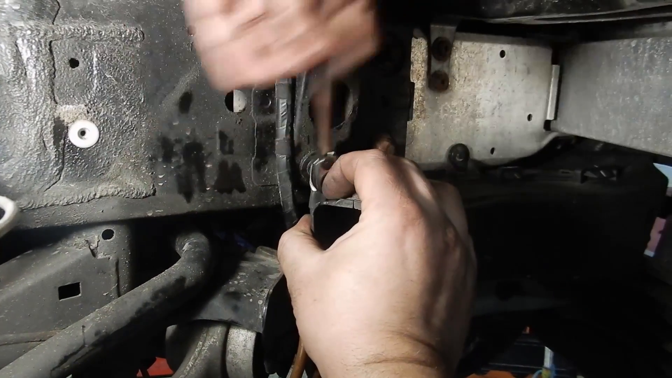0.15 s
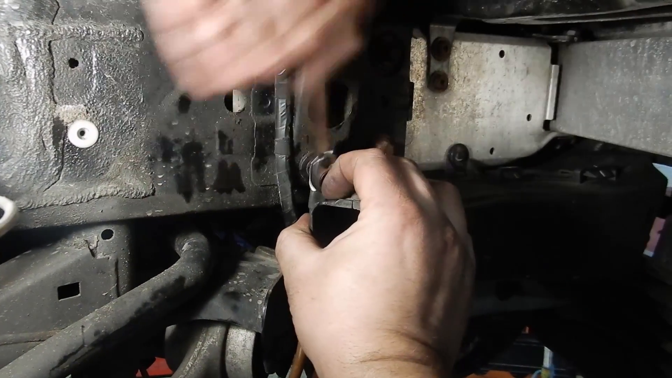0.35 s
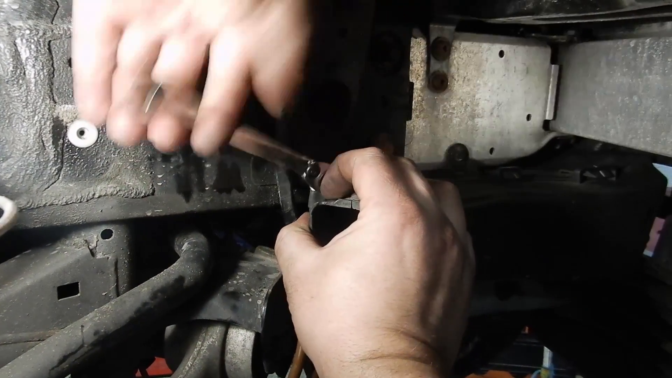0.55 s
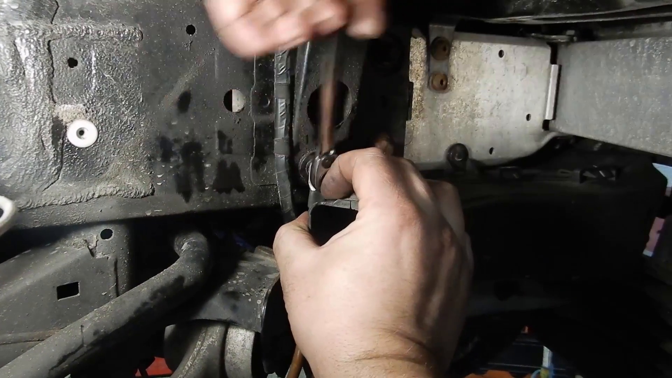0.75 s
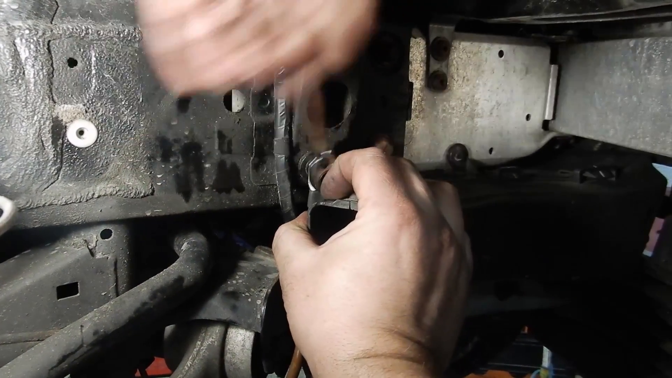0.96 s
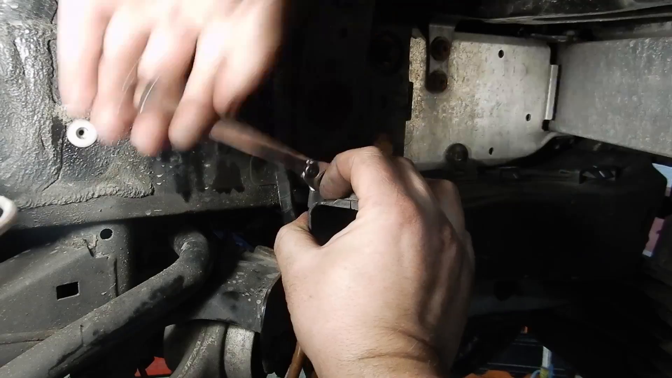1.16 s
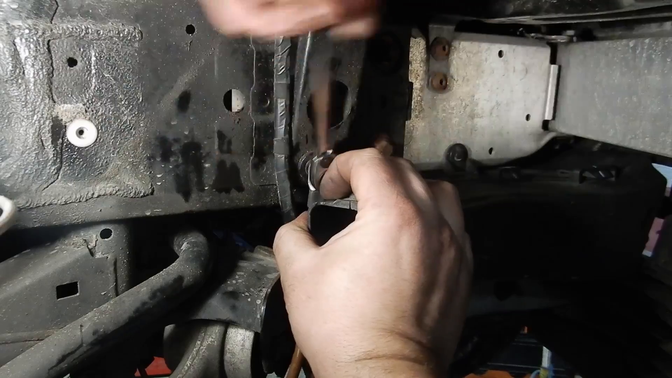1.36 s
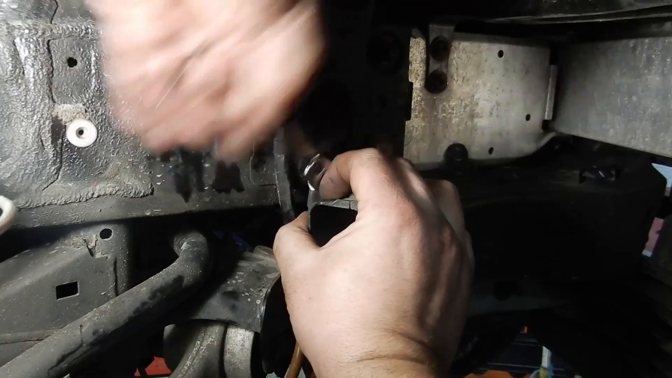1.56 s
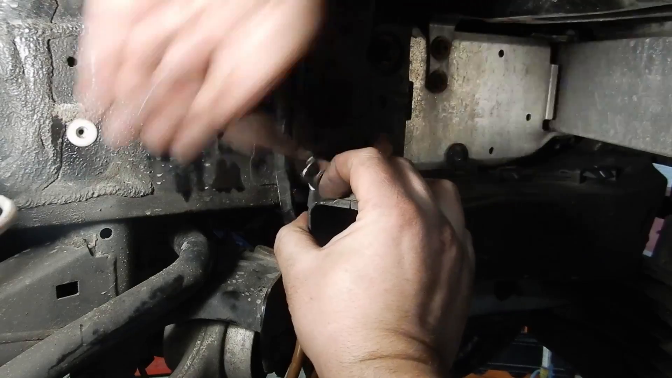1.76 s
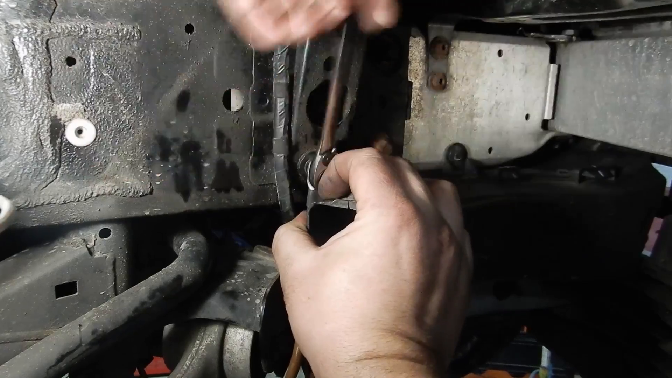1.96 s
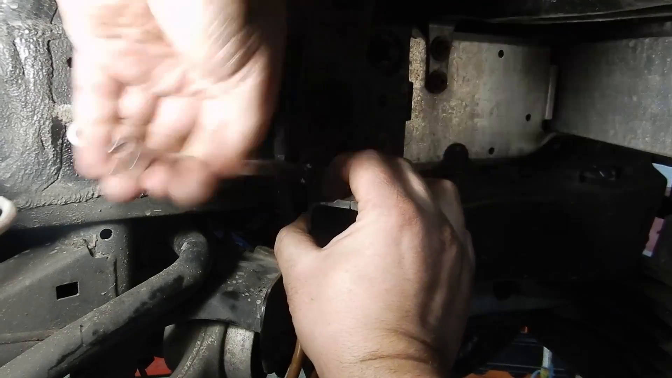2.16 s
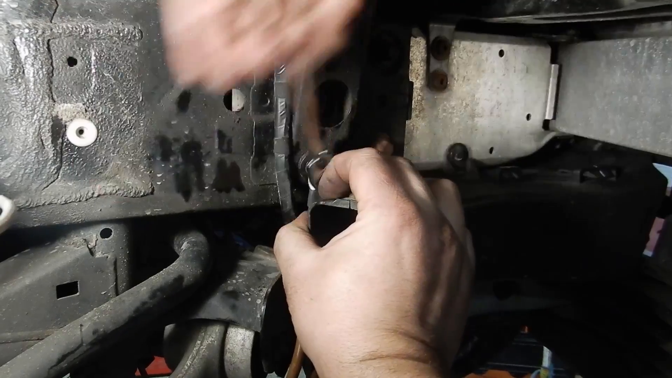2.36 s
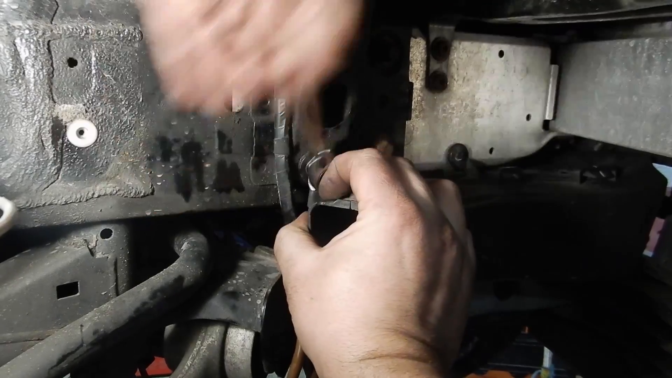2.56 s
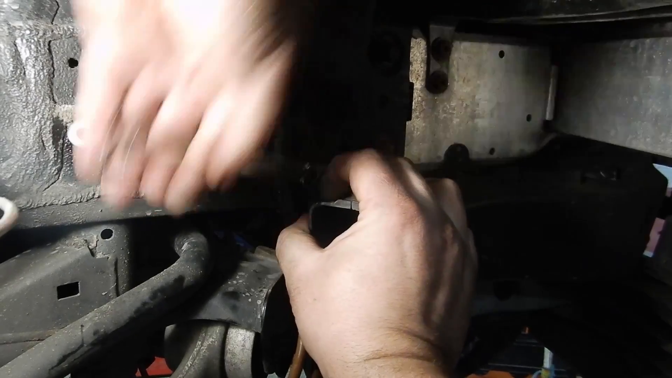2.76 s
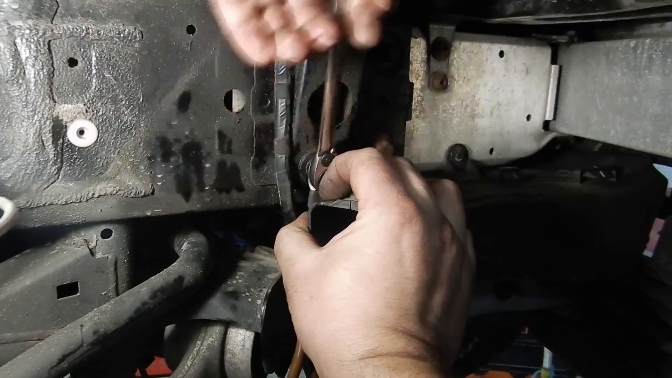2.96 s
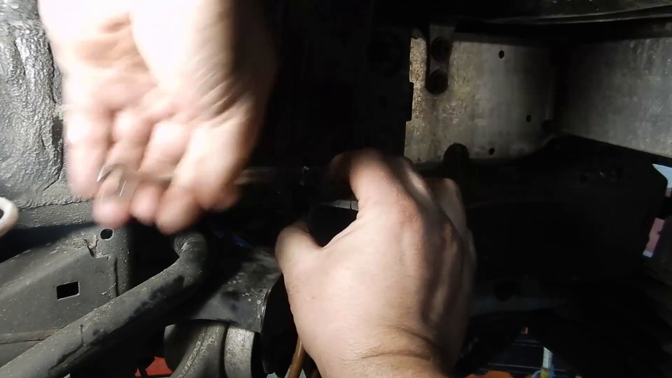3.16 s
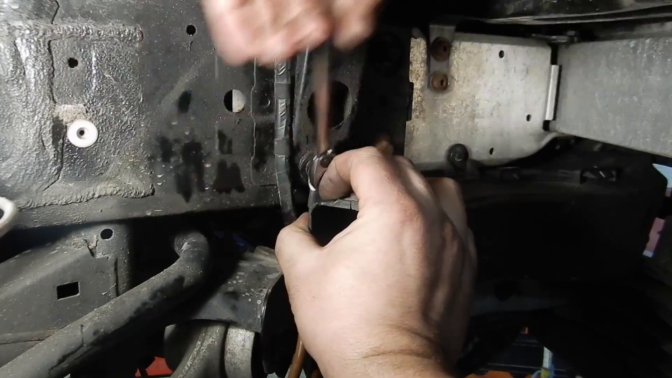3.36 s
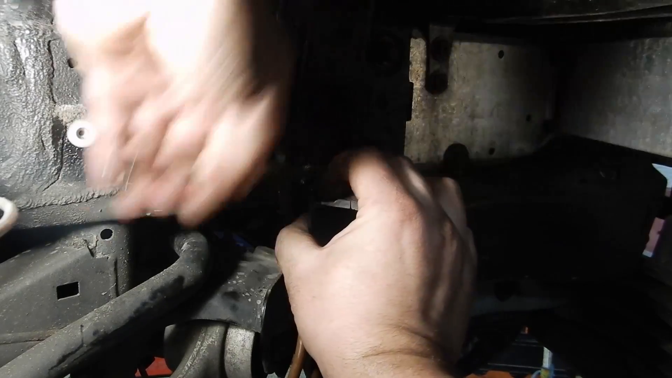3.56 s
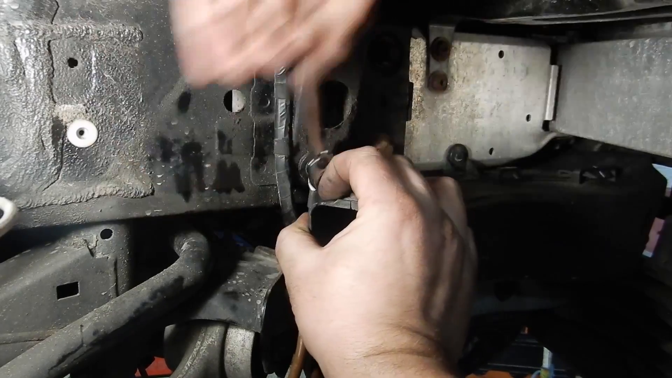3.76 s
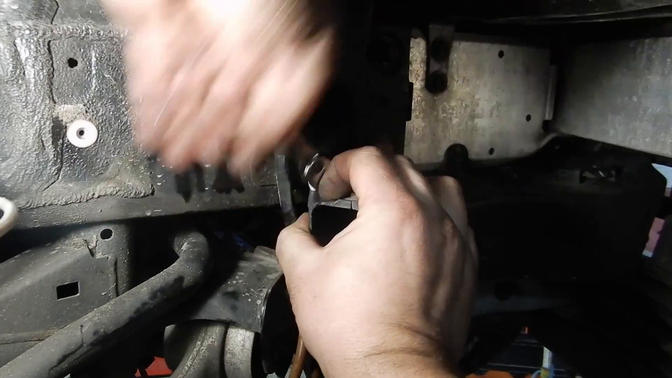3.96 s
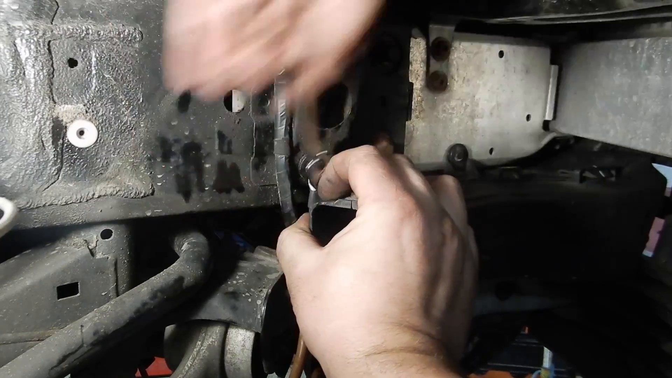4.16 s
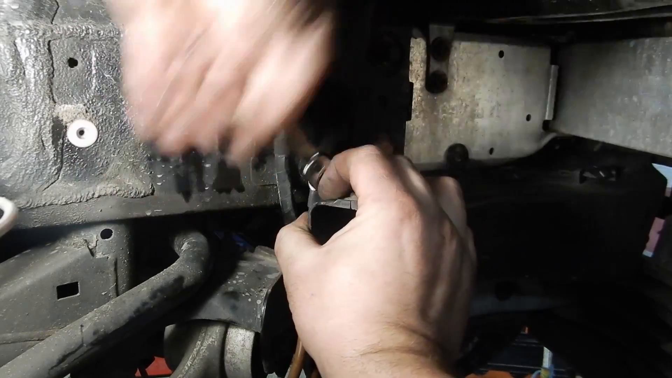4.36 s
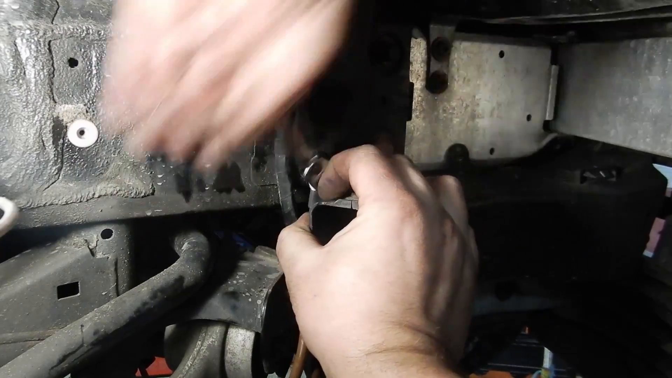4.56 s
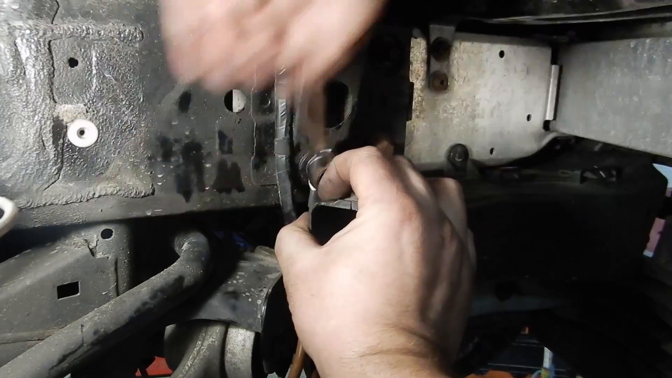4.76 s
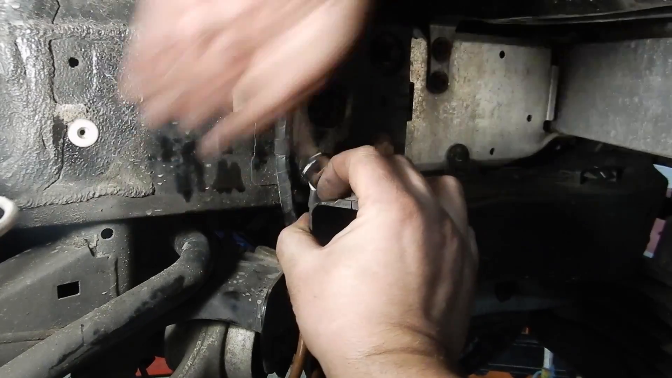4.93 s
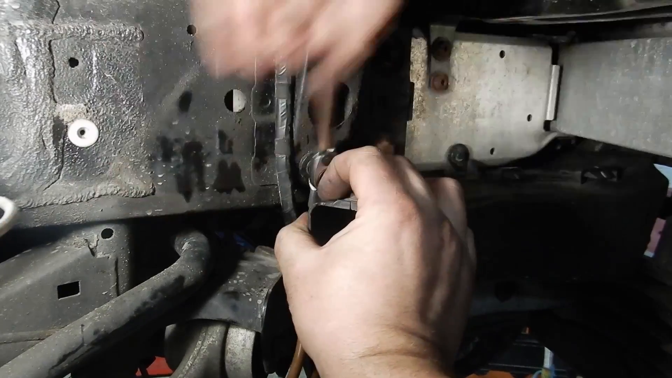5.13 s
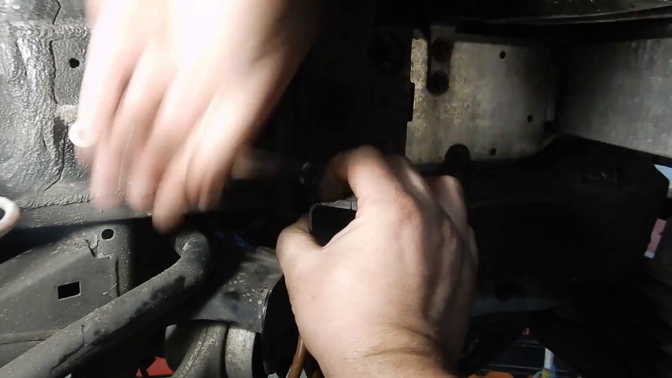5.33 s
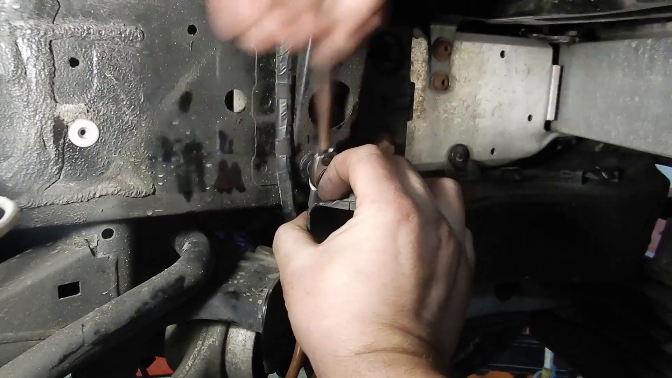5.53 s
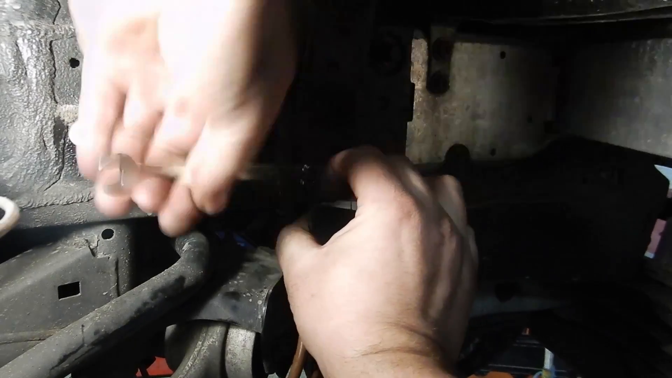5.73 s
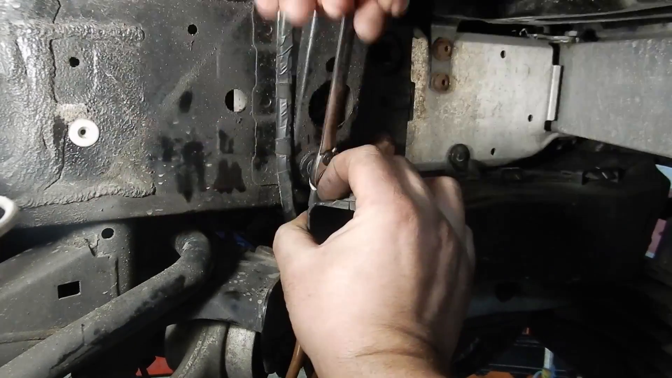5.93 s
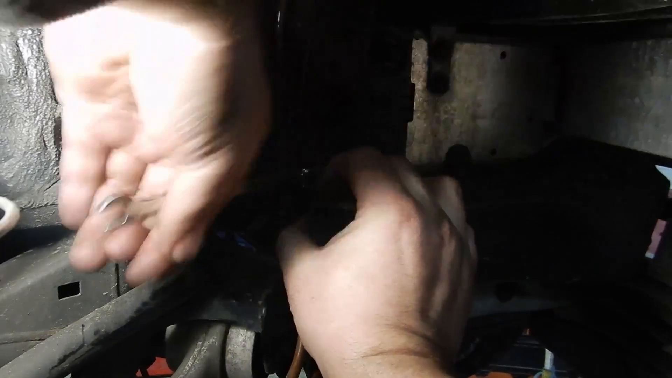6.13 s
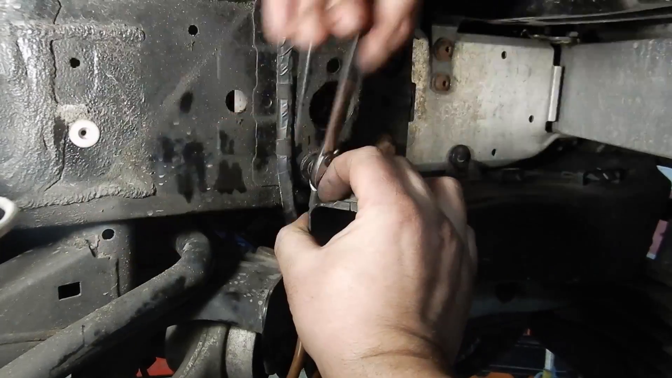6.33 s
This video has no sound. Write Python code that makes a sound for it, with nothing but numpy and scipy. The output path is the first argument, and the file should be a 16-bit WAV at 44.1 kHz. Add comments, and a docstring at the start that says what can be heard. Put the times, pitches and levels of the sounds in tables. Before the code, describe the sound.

Close stereo microphone under a car in a quiet garage. A ratcheting ring spanner swings back and forth: about every third of a second a rapid zip of eight to fifteen bright steel clicks, slowing at its end. Between zips the nut ticks faintly, its thread rubs and the hand rustles. Occasional dull bumps on sheet metal; low air and mains hum beneath.

```python
"""Under a car in a garage, close to the stereo microphone: air and a faint mains hum, then a ratcheting ring spanner.
On each back swing the pawl snaps over 8 to 15 teeth, slowing at the end, and rings the steel; each onset is softened.
On each drive swing between, the nut ticks and its thread rubs while the hands rustle, more with more effort.
Now and then the underbody is bumped; from about four seconds steel faintly sings on steel in a few slides.
Blows excite decaying resonances, rubs are coloured noise, walls add an echo and a limiter holds the loudest clicks."""
import sys
import numpy as np
from scipy import signal
from scipy.fft import irfft, next_fast_len
from scipy.io import wavfile
from scipy.ndimage import uniform_filter1d, minimum_filter1d

SR = 44100
rng = np.random.default_rng(int(sys.argv[2]) if len(sys.argv) > 2 else 0)


def persist_wave(psi):
    """Save psi, clipped to +-1, as 16-bit WAV."""
    counts = np.round(np.clip(psi, -1, 1) * 32767).astype(np.int16)
    wavfile.write(sys.argv[1], SR, np.atleast_2d(counts).T)


N = 281799
TIME = np.arange(N) / SR


def undb(db):
    """Decibels to gain."""
    return 10 ** (np.asarray(db) / 20)


def curve(rows, at):
    """Rows (s, value) joined by straight lines."""
    return np.interp(at, *np.transpose(rows))


def on_log(points, hz):
    """Points (Hz, value) joined on a log-frequency axis."""
    point_hz, value = np.transpose(points)
    return np.interp(np.log(hz + 1), np.log(point_hz), value)


def flicker(rate, depth_db):
    """A gain that wanders at random, with `rate` new values a second."""
    steps = rng.standard_normal(2048)
    return np.interp(TIME * rate, np.arange(len(steps)), undb(depth_db * steps))


def arches(rows):
    """Strokes (s, length s, level dB) that each swell and fade."""
    strokes = 0
    for s, length, db in rows:
        across = 2 * (TIME - s) / length - 1  # -1 to 1 over the stroke
        strokes = strokes + undb(db) * np.sqrt(np.clip(1 - across ** 2, 0, 1))
    return strokes


# How alike the left and right microphones hear the place.
# Each row: frequency in Hz, likeness from 0 to 1.
LIKENESS = [(100, .72), (600, .95), (1200, .965), (2500, .98), (4500, .85), (8000, .62), (13000, .37)]


def stereo_noise(spectrum, size=N):
    """Noise of a given colour and unit power at two microphones, less alike towards the treble."""
    padded = 512 * next_fast_len(size // 512 + 1, real=True)
    hz = np.arange(padded // 2 + 1) * SR / padded
    gain = undb(on_log(spectrum, hz))
    gain = gain * np.sqrt(padded / np.mean(gain ** 2)) / 2
    alike = np.clip(on_log(LIKENESS, hz), 0, 1)
    random_bins = rng.standard_normal((2, 2 * len(hz))).view(complex)
    mid, side = random_bins * gain * np.sqrt([1 + alike, 1 - alike])
    return irfft(np.array([mid + side, mid - side], np.complex64), padded)[:, :size]


def convolve(x, response):
    """Pass a sound through a response."""
    return signal.oaconvolve(np.atleast_2d(x), np.atleast_2d(response), axes=-1)[:, :N]


def blows(s, size):
    """One impulse for each blow."""
    return np.bincount(np.clip(s * SR, 0, N - 1).astype(int), size, N)


def chatter(s, size, bounce_s, share, count=5):
    """Each blow is a short run of contacts of steel on steel, the later ones pushing either way."""
    chance = rng.random((len(s), count, 2))
    contacts = blows(s, size)
    for when, push in chance.transpose(1, 2, 0):
        contacts = contacts + blows(s + bounce_s * when, size * share * np.sign(push - .5))
    return contacts


def ring(x, modes, damping, wander_db):
    """Decaying modes that swell and fade as the grip shifts; the higher ones reach the microphones out of step."""
    mid, side, power = np.zeros(N), np.zeros(N), 0
    x = x + 1e-18  # keeps the filters clear of vanishing numbers
    for k, (hz, width, db) in enumerate(modes):
        gain = undb(db) * width
        pole = np.exp(np.pi * (2j * hz - width * damping) / SR)
        start_phase = np.exp(2j * np.pi * rng.random())
        mode = signal.lfilter([gain * start_phase], [1, -pole], x)
        swell = flicker(rate=3.98, depth_db=wander_db)
        apart = np.arccos(np.clip(on_log(LIKENESS, hz), 0, 1)) / 2 * (-1) ** k
        mid += np.cos(apart) * swell * mode.imag
        side += np.sin(apart) * swell * mode.real
        power += gain ** 2 / 2
    return np.array([mid + side, mid - side]) / np.sqrt(power)


def dense_ring(s, size, spectrum, t60_low, t60_high):
    """Resonances too crowded to tell apart: every blow leaves a burst of noise whose treble dies first."""
    noise = stereo_noise(spectrum)
    low = signal.sosfiltfilt(signal.butter(2, 8500, fs=SR, output="sos"), noise)
    power = blows(s, size ** 2)

    def fade(t60):
        """Powers of successive blows add up and die away by 60 dB in t60 seconds."""
        keep = np.exp(-2 * np.log(1000) / (t60 * SR))
        return np.sqrt(signal.lfilter([1], [1, -keep], power + 1e-18))

    return low * fade(t60_low) + (noise - low) * fade(t60_high)


def steady_ring(x, spectrum, t60):
    """Crowded resonances that answer every blow alike."""
    t = TIME[:SR // 8]
    response = stereo_noise(spectrum, size=len(t)) * np.exp(-np.log(1000) * t / t60)
    return convolve(x, response)


# Colour of the garage air. Each row: frequency in Hz, relative level in dB.
AIR = [(25, 0), (70, -4), (160, 4.5), (400, -5.5), (900, -11), (1400, -12.5), (2400, -6), (5000, -15.5),
       (8000, -21.5), (15000, -37)]
# Mains hum, before its wander and left-right balance. Each row: frequency in Hz, level in dB.
HUM = [(50, -64), (100, -92.5), (150, -65), (250, -71.5)]
# A low drone that comes and goes, before its left-right balance. Each row: time in seconds, level in dB.
DRONE = [(0, -61.5), (.2, -67), (.55, -57), (.8, -67), (1.9, -65), (2.4, -60), (3.1, -58), (4.3, -72),
         (6.39, -73)]


def garage():
    """Still air as noise, mains hum as sines and a wavering low drone, the lows stronger on the left."""
    air = stereo_noise(AIR) * undb(-62.5)
    hum = 0
    for hz, db in HUM:
        hum = hum + undb(db) * np.sqrt(2) * np.sin(2 * np.pi * (hz * TIME + rng.random()))
    drone = stereo_noise([(60, -50.5), (98, -16.5), (113, -0.5), (130, -10.5), (180, -14.5), (600, -65.0)])
    lows = hum * flicker(rate=3.295, depth_db=2.0) + drone * undb(curve(DRONE, TIME))
    return air + lows * undb(np.array([[1.5], [-2.5]]))


# The back swings of the spanner, close to the microphone.
# Each row: first tooth in seconds, last tooth in seconds, number of teeth, braking at the end in tooth gaps,
# relative level in dB, swell from first to last tooth in dB, strength of the low ring in dB,
# shake of the panel in dB, brightness in dB, effort of the drive swing that follows in dB.
SWINGS = [(.004, 0.0867, 8, 4, -22.5, 10.5, -9.5, -0.5, -1.5, -7),
          (.307, 0.3925, 10, 2.72, -26, 16.5, -5, 3.5, -0.5, -3),
          (0.626, 0.6984, 9, .7, -22, 8, -9.5, -0.5, -3, -1.5),
          (0.9252, 1.0002, 9, 1.12, -23, 11, -9, 3.5, -1, -0.5),
          (1.2251, 1.2976, 8, 1.62, -21, 10, -12.5, 5, -1, -1.5),
          (1.5167, 1.6354, 11, 4.4, -22, 5, -9.5, 1, -2, 2.5),
          (1.8493, 1.939, 11, 2.5, -20.5, 11.5, -9.5, -0.5, -2, 1),
          (2.1722, 2.274, 11, 3.46, -21, 4.5, -10.5, 1.5, 0.5, -1),
          (2.4952, 2.5835, 11, 1.92, -20, 10.5, -13.5, 7, -2, -0.5),
          (2.8186, 2.914, 12, 1.42, -20.5, 11, -5.5, 1.5, 1.5, 4),
          (3.1614, 3.2838, 12, 5.2, -20.5, 3.5, -3, -4.5, 1.5, 0.5),
          (3.5297, 3.632, 13, 1.4, -21, 7.5, -4, -0.5, 1, 3),
          (3.9068, 4.006, 12, 2.6, -20, 4, -8.5, -5.5, -3, -6),
          (4.289, 4.3974, 13, 2.94, -24.5, 5, -6, 2, 0.5, -7.5),
          (4.6682, 4.7686, 13, 2.8, -29.5, 12.5, -5, 0.5, 3.5, -6),
          (5.0423, 5.1268, 12, 1.6, -26.5, 7.5, -12, 3.5, 0.5, -4),
          (5.3929, 5.5228, 14, 5.9, -28.5, 4, -8.5, -0.5, 1.5, -2),
          (5.773, 5.8634, 12, 1.7, -23, 10, -6, -3, -0.5, -3),
          (6.1312, 6.2352, 15, 2.2, -26.5, 7, -7, -2.5, 3, 1.5)]
# Crowded small resonances of the tool. Each row: frequency in Hz, relative level in dB.
CLATTER = [(900, -48), (1450, -31.5), (2000, -7), (2800, -2), (3600, -1.5), (5200, -5), (6700, 0),
           (8200, 2), (9300, -3.5), (10500, -7.5), (11600, -4.5), (14000, -8.5), (15700, -11)]
# the soft onset: how much before the first click, level against the swing in dB
ONSET_LEAD_S, ONSET_DB = 0.0045, -17


def soft_onset():
    """A faint short noise just before the first click of each swing softens its onset."""
    first, _, _, _, db, *_ = np.transpose(SWINGS)
    return dense_ring(first - ONSET_LEAD_S, undb(db + ONSET_DB), CLATTER, t60_low=.05, t60_high=.03)


# the hand gathers speed and brakes: extra length of the first gap in gaps; lag and braking fade with power EASE
START_LAG, EASE = .5, 1.25
TOOTH_JITTER_S, TOOTH_SCATTER_DB = .0003, 1.68


def teeth():
    """One row per tooth (s, level dB, low ring dB, panel dB, brightness dB), closest together in mid swing."""
    rows = []
    for first, last, number, braking, db, swell_db, *colour, _ in SWINGS:
        k = np.arange(1, round(number))
        gaps = 1 + START_LAG / k ** EASE + braking / k[::-1] ** EASE
        progress = np.append(0, np.cumsum(gaps)) / gaps.sum()
        rows += [(first + (last - first) * p, db + swell_db * (p - .5), *colour) for p in progress]
    rows = np.array(rows)
    return rows + rng.standard_normal(rows.shape) * [TOOTH_JITTER_S, TOOTH_SCATTER_DB, 0, 0, 0]


# Modes of the free spanner. Each row: frequency in Hz, width in Hz before damping, relative level in dB.
SPANNER = [(1850, 52, -7.5), (2056, 50, 0.5), (2281, 47, -2.5), (2448, 73, -2.5), (2645, 44, -1.5),
           (2817, 60, 2), (3006, 21, -1.5), (3410, 98, -23), (4160, 28, -1.5), (4470, 63, 0.5),
           (4800, 34, -10), (4846, 40, 5.5), (5140, 88, -0.5), (5280, 42, 2.5), (5530, 69, 2.5),
           (5705, 91, -0.5), (5856, 117, -1.5), (5985, 180, -4), (6600, 47, -4), (6680, 81, -9),
           (7750, 44, -19.5), (7670, 41, 1.5), (7866, 150, 3), (7724, 68, -0.5), (7760, 68, -3),
           (8260, 19, -15.5), (8860, 125, 0)]
# The small pawl and its spring. Each row: frequency in Hz, width in Hz before damping, relative level in dB.
PAWL = [(9940, 92, -3), (9940, 108, 3), (10500, 127, -6.5), (10580, 74, -1), (11100, 220, -6),
        (12000, 90, -7.5), (11640, 140, -13.5), (13280, 190, -1), (13360, 126, 1.5), (13680, 99, 1),
        (14000, 150, -1.5), (14300, 114, -8), (15600, 130, 0)]
# Crowded resonances of the panel behind the tool. Each row: frequency in Hz, relative level in dB.
PANEL = [(200, -40.5), (360, -9.5), (480, -7.5), (640, 0.5), (880, 2), (1060, -9.5), (1250, -7.5),
         (1420, -39), (1700, 2.5), (2500, -30.5)]
# a fast swing throws the pawl harder: lift at a crawl, speed where the rise begins, rise in dB per dB of speed
CRAWL_DB, THROW_FROM_DB, THROW = 3.5, -7.5, 0.51


def ratchet():
    """Tooth clicks ring the spanner and panel; the closer the teeth in time, the harder, most of all in the lows."""
    s, db, grip_db, panel_db, bright_db = teeth().T
    gaps = np.diff(s, prepend=-1, append=2 * N / SR)
    tooth_gap = np.clip(np.minimum(gaps[:-1], gaps[1:]), .005, .02)
    speed_db = 20 * np.log10(np.median(tooth_gap) / tooth_gap)
    db = db + CRAWL_DB + THROW * np.maximum(speed_db - THROW_FROM_DB, 0)
    low_db = db + grip_db + 0.64 * speed_db
    treble_db = db + bright_db

    low_modes = [m for m in SPANNER if m[0] < 4000]
    high_modes = [m for m in SPANNER if m[0] >= 4000]
    shank_blows = chatter(s, undb(low_db - 4.5), bounce_s=0.003003, share=0.52)
    shank = ring(shank_blows, low_modes, damping=1.03, wander_db=2.0)
    head_blows = chatter(s, undb(db - 9.0), bounce_s=.0025, share=0.81)
    head = ring(head_blows, high_modes, damping=0.9, wander_db=0.5)
    pawl_blows = chatter(s, undb(treble_db - 10), bounce_s=.002, share=0.67)
    pawl = ring(pawl_blows, PAWL, damping=0.98, wander_db=3)

    clatter = dense_ring(s, undb(treble_db - 6.5), CLATTER, t60_low=0.068, t60_high=0.031)
    gear_blows = chatter(s, undb(treble_db - 11.0), bounce_s=.002, share=0.42)
    gear = steady_ring(gear_blows, CLATTER, t60=0.044)
    # a short faint burst of noise before each click softens its onset
    lead_s = s - rng.uniform(0.0015, 0.0024, len(s))
    lead_in = dense_ring(lead_s, undb(db - 10.5), CLATTER, t60_low=0.055, t60_high=0.026)
    shake_db = low_db + panel_db + 0.084 * speed_db - 14.5
    panel = dense_ring(s, undb(shake_db), PANEL, t60_low=0.062, t60_high=.03)
    return shank + head + pawl + clatter + gear + lead_in + panel


LOAD_S = .06  # the gain moves to and from each drive swing's effort over this time
BACK_SWING_DB = -2.5  # relative level of rub and rustle during back swings


def drives():
    """The drive swings fill the time between the back swings: (start s, end s, effort dB)."""
    ends = [swing[0] for swing in SWINGS[1:]] + [N / SR + LOAD_S]
    return [(swing[1], end, swing[-1]) for swing, end in zip(SWINGS, ends)]


def load():
    """Level of rub and rustle as a gain: it moves to each drive swing's effort, holds and returns."""
    load_db = BACK_SWING_DB
    for start, end, effort_db in drives():
        ramp = np.clip(np.minimum(TIME - start, end - TIME) / LOAD_S, 0, 1)
        load_db = load_db + (effort_db - BACK_SWING_DB) * ramp
    return undb(load_db)


# faint slips on each drive swing: how many, relative level at 0 dB effort, brightness
SLIP_COUNT, SLIP_DB, SLIP_BRIGHT_DB = 2, -38.5, -15.5


def slips():
    """Faint ticks of the nut at random moments of each drive swing: (s, level dB, brightness dB)."""
    rows = []
    for start, end, effort_db in drives():
        for p in rng.random(SLIP_COUNT):
            rows.append((start + (end - start) * p, SLIP_DB + effort_db, SLIP_BRIGHT_DB))
    return rows


# The nut catches and slips under load. Each row: start in seconds, relative level in dB, brightness in dB.
TICKS = [(0.269, -37, -17), (0.445, -34, -7), (0.785, -32, 5), (0.81, -32.5, -15), (1.057, -27.5, 4),
         (1.124, -32, 5), (1.141, -32.5, -20), (1.368, -34.5, -10), (1.688, -33.5, 2.5), (1.708, -34, 6.5),
         (1.726, -32, -7), (1.741, -30.5, -1), (2.029, -28, -2), (2.047, -31, 1.5), (2.063, -28.5, -1),
         (2.082, -27.5, 2), (2.113, -30, 5.5), (2.399, -31.5, -6), (2.698, -34.5, -9), (2.717, -29, 0),
         (2.74, -29, -1.5), (3.049, -26, -9.5), (3.074, -25.5, 0), (3.709, -29, -17), (3.745, -26, -10.5),
         (3.762, -25.5, -4.5), (3.891, -28.5, -5), (4.072, -31.5, -9), (4.522, -33.5, -16),
         (4.838, -31, -11), (5.232, -33.5, 2.5), (5.245, -30, -1.5), (5.925, -30.5, 0), (6.345, -33.5, 2),
         (6.36, -30.5, -2)]
# Modes of spanner and stud pressed together.
# Each row: frequency in Hz, width in Hz before damping, relative level in dB.
STUD = [(620, 90, -9), (760, 90, -6), (920, 85, -1), (1850, 80, -8), (2230, 55, -5), (2520, 75, -3),
        (3070, 110, -5), (3520, 90, -4), (4220, 80, -3), (4990, 150, -8), (5290, 130, -9), (6440, 80, -10),
        (7340, 130, -7)]
# Crowded small resonances of the nut. Each row: frequency in Hz, relative level in dB.
CRACK = [(300, -9), (900, -0.5), (1400, -15.5), (2400, -5), (4300, -8), (7500, -11), (9000, -9.5),
         (15500, -17)]
RUB_DB = -63  # thread friction at 0 dB effort, before its grain


def nut():
    """Under load the nut slips in small jerks that ring the stud, and its thread rubs as grainy noise."""
    s, db, bright_db = np.transpose(TICKS + slips())
    treble_db = db + bright_db
    knock_modes = [m for m in STUD if m[0] < 3300]
    ping_modes = [m for m in STUD if m[0] >= 3300]
    knock_blows = chatter(s, undb(db - 12.0), bounce_s=.0015, share=0.36)
    knock = ring(knock_blows, knock_modes, damping=0.63, wander_db=2)
    ping_blows = chatter(s, undb(treble_db - 12.0), bounce_s=0.00083, share=0.41)
    ping = ring(ping_blows, ping_modes, damping=0.64, wander_db=0.5)
    crack = dense_ring(s, undb(treble_db - 7.5), CRACK, t60_low=0.057, t60_high=0.023)
    rub = stereo_noise([(250, -17.5), (520, 4.5), (700, 1), (950, 0.5),
                        (1300, -16.0), (2400, -13.5), (6000, -16), (15000, -42)])
    grain = flicker(rate=70, depth_db=4)
    return knock + ping + crack + rub * grain * load() * undb(RUB_DB)


# Skin rustles as the hand shifts its grip. Each row: start in seconds, length in seconds, level in dB before flicker.
GRIPS = [(.38, 0.21, -59), (1.56, 0.16, -54), (2.96, 0.17, -67)]
SKIN_DB = -65  # skin on steel at 0 dB effort, before its flicker


def hands():
    """Skin shifts softly on the tool: dull noise that follows the effort, with a swell at each new grip."""
    rustle = stereo_noise([(80, -17), (220, -3.5), (380, 15.5), (600, -12.0), (1400, -34.5), (8000, -53)])
    return rustle * flicker(rate=44, depth_db=2) * (load() * undb(SKIN_DB) + arches(GRIPS))


# Hands and tool bump the underbody. Each row: start in seconds, relative level in dB, pitch in Hz.
BUMPS = [(.14, -39, 587), (0.267, -38, 410), (0.311, -33, 422), (0.336, -36.5, 287), (0.343, -27, 1240),
         (0.551, -40, 168), (0.609, -35, 154), (.87, -43, 733), (1.07, -33, 599), (4.258, -36.5, 396),
         (4.296, -35, 354), (4.346, -35, 365), (5.572, -42, 674), (5.94, -35, 628), (6.086, -62, 340)]


def bumps(t60=.058, soft_s=.003):
    """Soft knocks, each a short dull note of the sheet metal."""
    t = TIME[:SR // 4]
    envelope = np.exp(-np.log(1000) * t / t60) * (1 - np.exp(-t / soft_s))
    out = np.zeros(N + len(t))
    for s, db, hz in BUMPS:
        start = int(s * SR)
        out[start:start + len(t)] += undb(db) * np.sin(2 * np.pi * hz * t) * envelope
    return out[:N]


# The ring of the spanner slides on the nut. Each row: start in seconds, length in seconds, level in dB.
SLIDES = [(3.82, 0.17, -59), (4.84, 0.072, -79), (5.17, .06, -57), (5.56, 0.16, -61)]
# Singing resonances of the slide. Each row: frequency in Hz, width in Hz, relative level in dB.
SING = [(2276, 110, 1.5), (3500, 170, -3), (3540, 61, -19), (4200, 80, -7), (6580, 120, -5.5),
        (8300, 190, -9.5)]


def slides():
    """Steel sliding on steel sings faintly: rough noise drives the resonances."""
    friction = rng.standard_normal(N) * flicker(rate=90, depth_db=3)
    song = ring(friction, SING, damping=1, wander_db=2)
    return song / np.std(song) * arches(SLIDES)


# Colour of the garage echo. Each row: frequency in Hz, relative level in dB.
ECHO = [(200, -6), (800, 8.5), (2500, 1), (5000, -5), (8000, -9.5), (15000, -10.5)]


def echo(x, t60, wet_db, build_s):
    """The diffuse tail of the garage walls: noise that builds quickly and dies exponentially."""
    t = TIME[:SR]
    tail = stereo_noise(ECHO, size=SR) * np.exp(-np.log(1000) * t / t60) * (1 - np.exp(-t / build_s))
    return convolve(x, tail / np.sqrt(np.sum(tail ** 2) / 2)) * undb(wet_db)


def scene():
    """The tool close by, in its room."""
    tool = ratchet() + nut() + bumps() + soft_onset()
    return tool + echo(tool, t60=0.4, wet_db=-27, build_s=0.0057) + slides() + hands() + garage()


def limiter(x, top_db, ratio, release_s):
    """Loud runs of clicks turn the gain down, and the background ducks with them."""
    # the envelope jumps to each peak and sinks exponentially from it
    sink = TIME / release_s
    peak_log = np.log(np.abs(x).max(axis=0) + 1e-12)
    envelope = np.exp(np.maximum.accumulate(peak_log + sink) - sink)
    gain = np.maximum(envelope / undb(top_db), 1) ** (1 / max(ratio, 1) - 1)
    return x * uniform_filter1d(minimum_filter1d(gain, size=45), size=45)


TOP_HZ = 15750  # the treble is cut above this


def record(dry):
    """The left microphone hears a little more treble; a fast limiter holds the peaks and the top is cut."""
    treble = signal.sosfiltfilt(signal.butter(2, 5500, "high", fs=SR, output="sos"), dry)
    ports = dry + treble * 0.058 * np.array([[1], [-1]])
    held = limiter(ports, top_db=-19.0, ratio=2.02, release_s=0.037)
    return signal.sosfilt(signal.ellip(10, .2, 70, TOP_HZ, fs=SR, output="sos"), held)


dry = scene()
out = record(dry)
persist_wave(out)
```